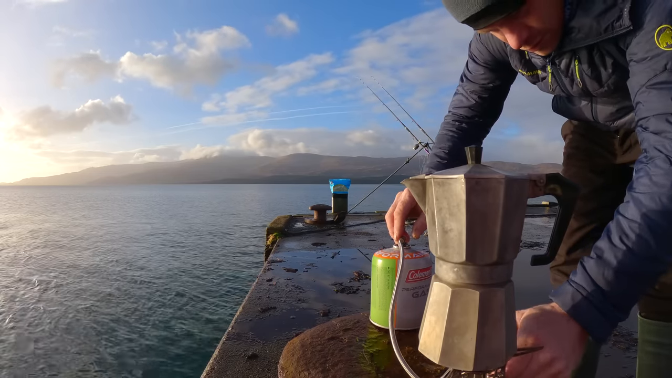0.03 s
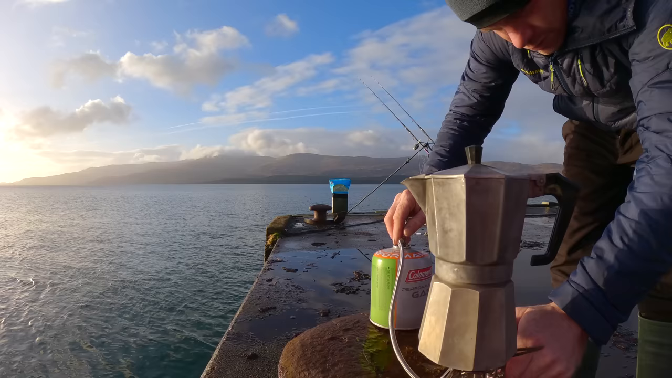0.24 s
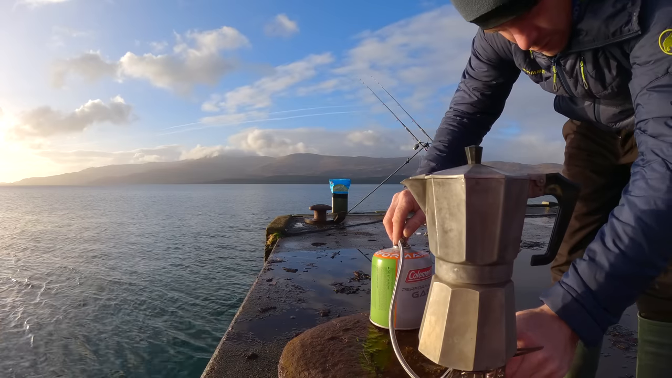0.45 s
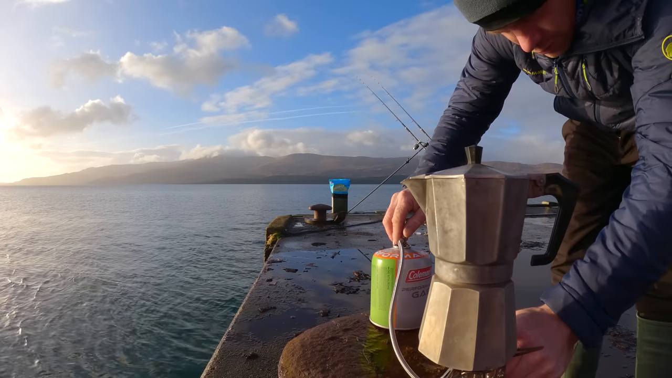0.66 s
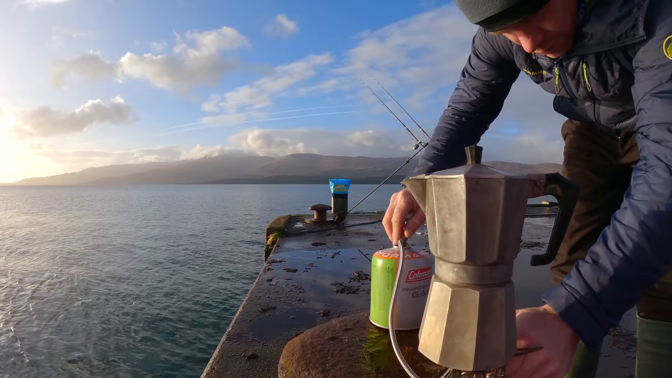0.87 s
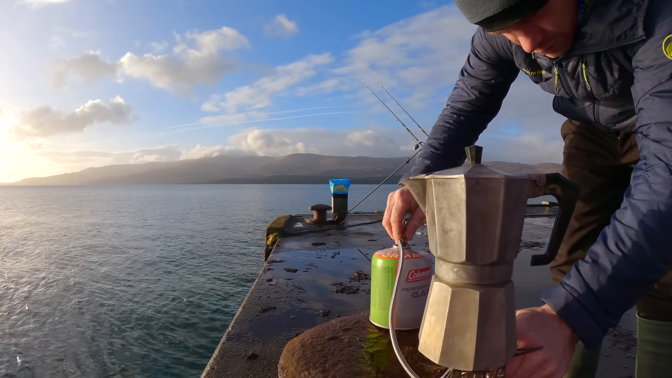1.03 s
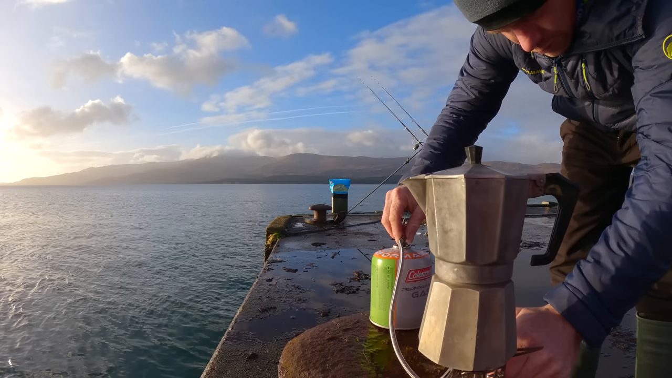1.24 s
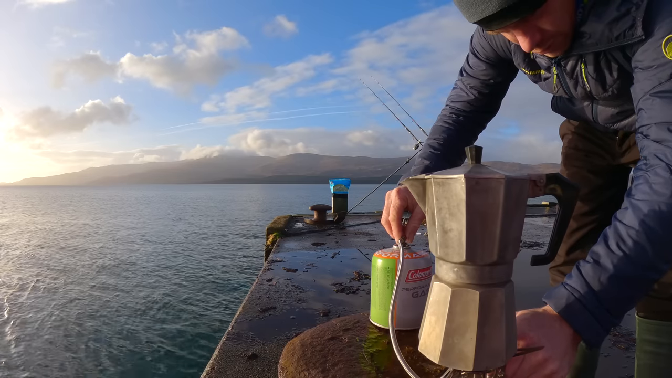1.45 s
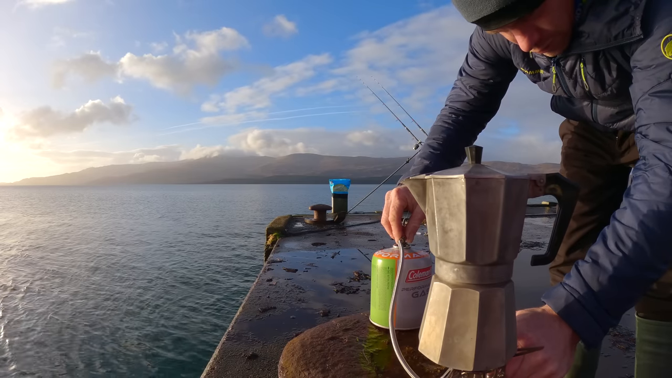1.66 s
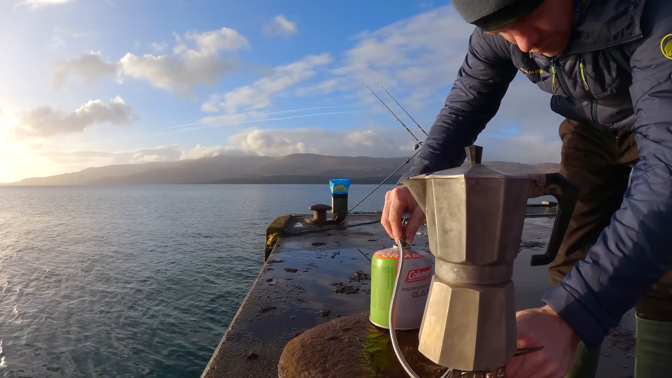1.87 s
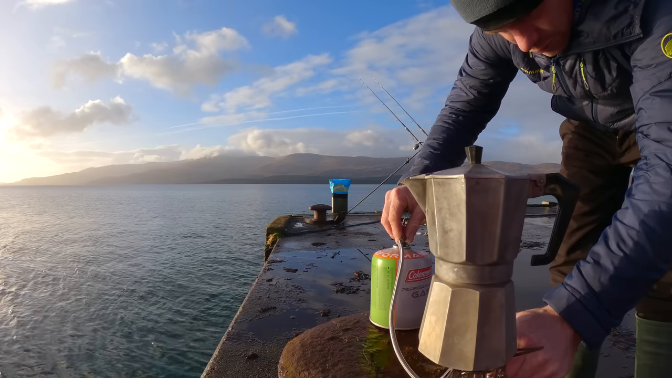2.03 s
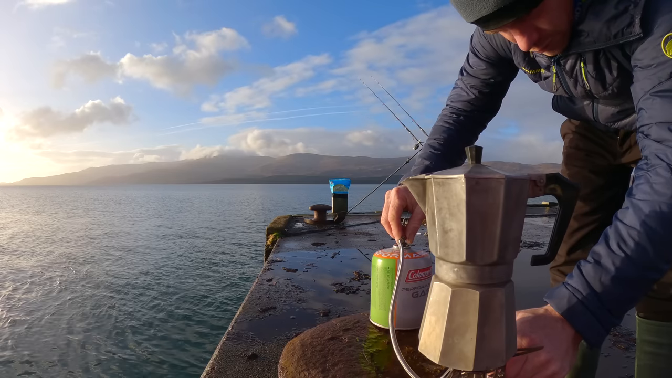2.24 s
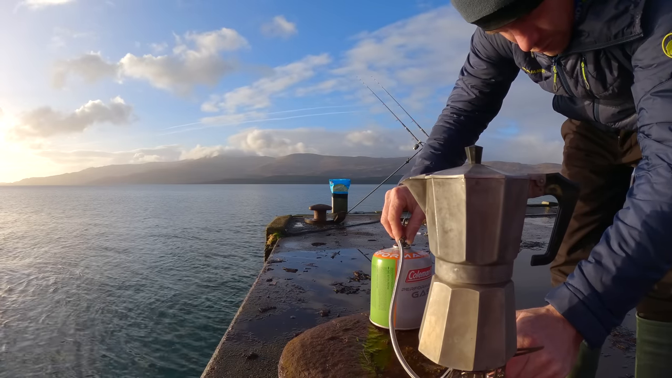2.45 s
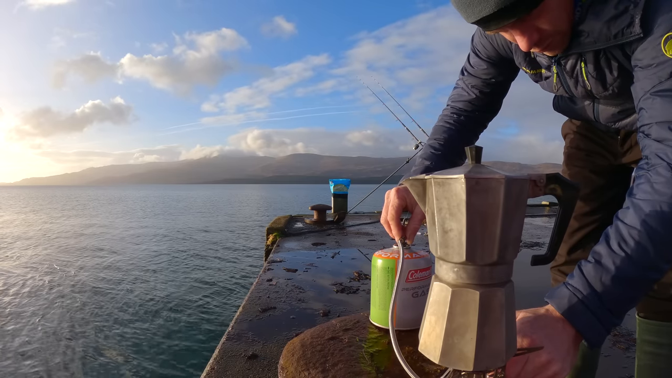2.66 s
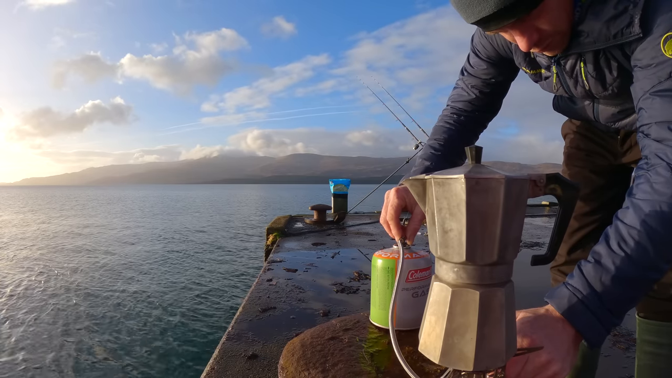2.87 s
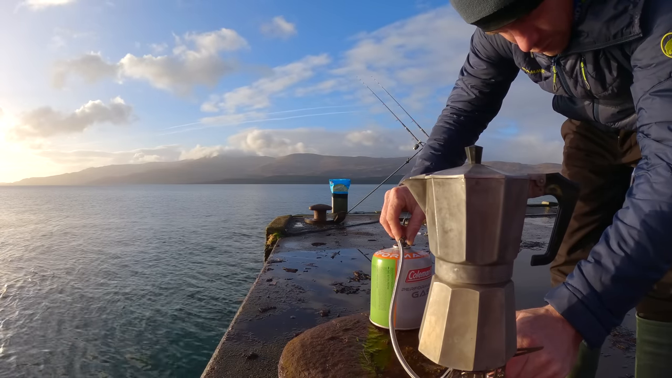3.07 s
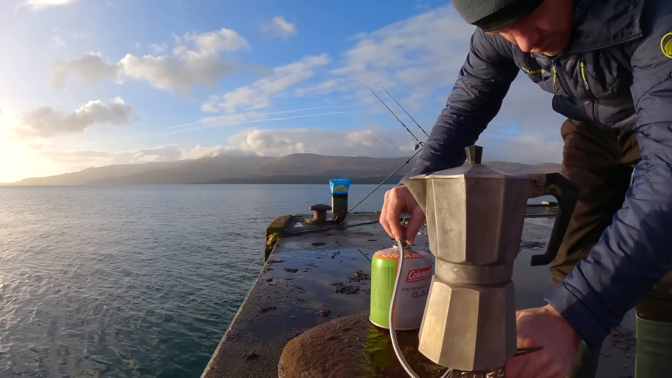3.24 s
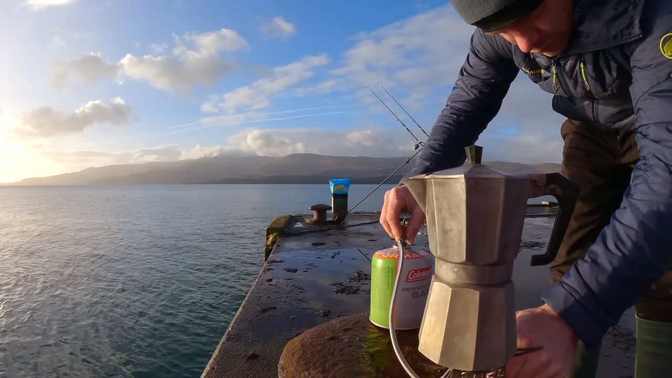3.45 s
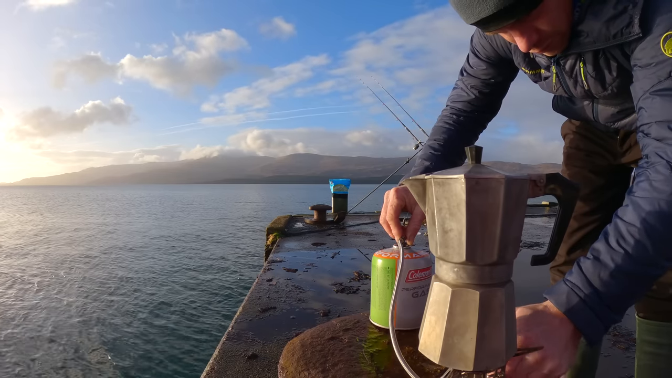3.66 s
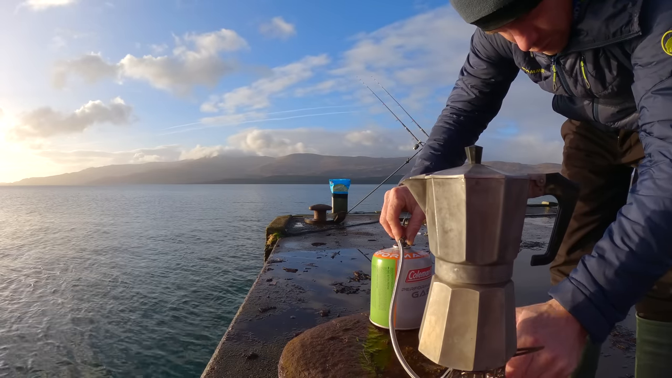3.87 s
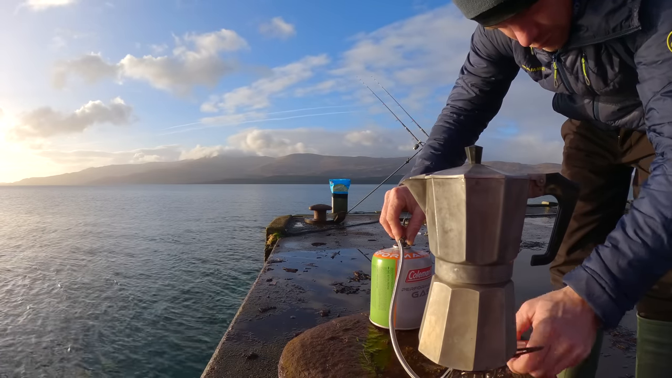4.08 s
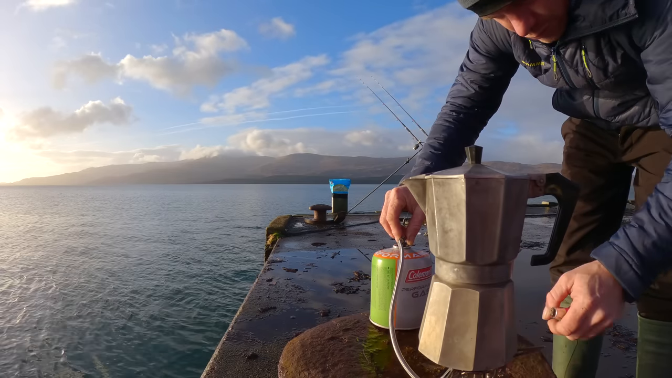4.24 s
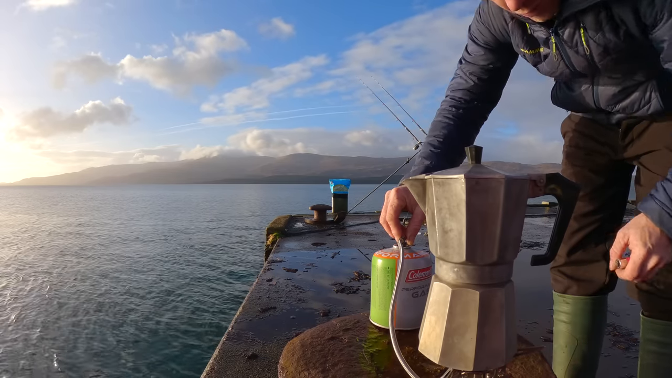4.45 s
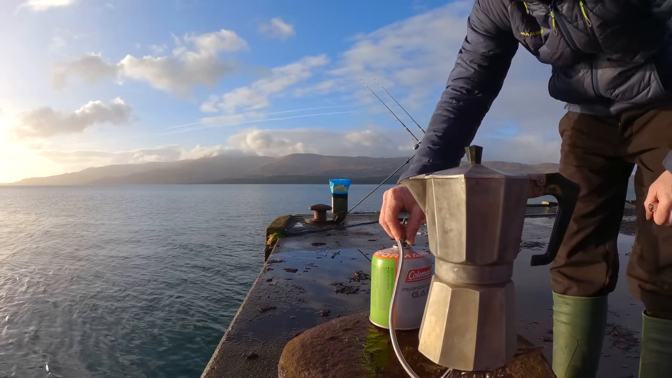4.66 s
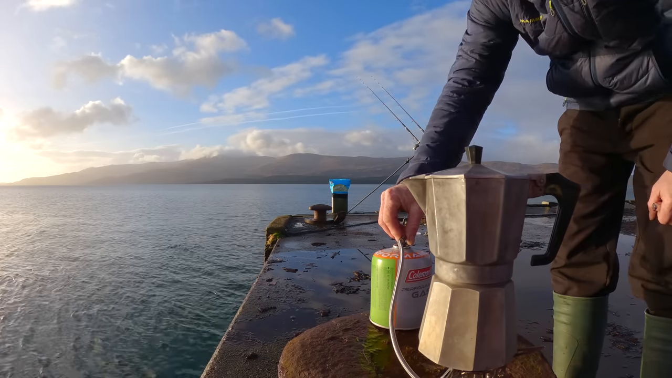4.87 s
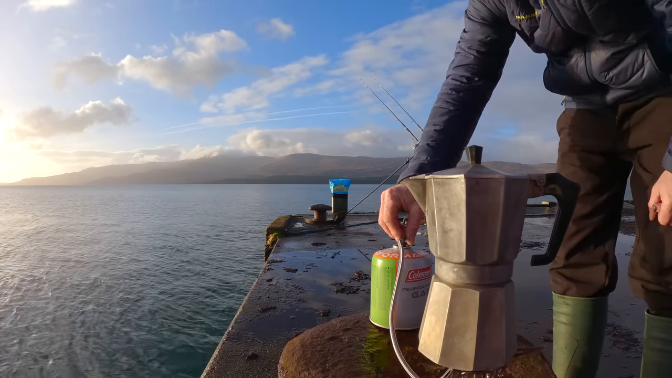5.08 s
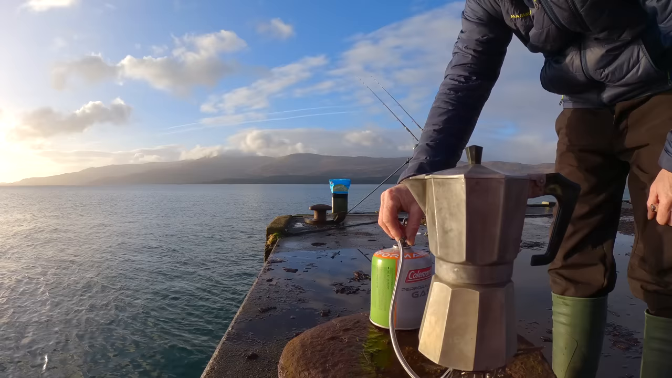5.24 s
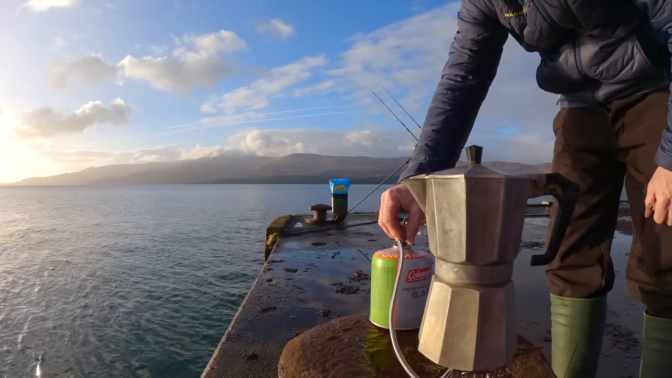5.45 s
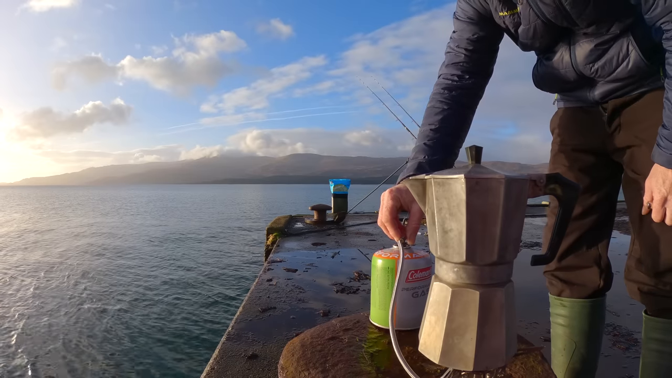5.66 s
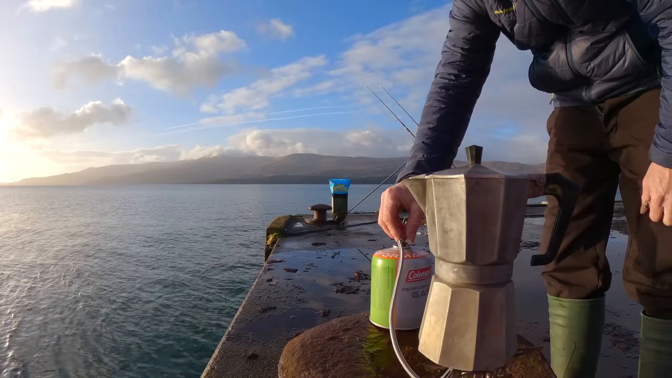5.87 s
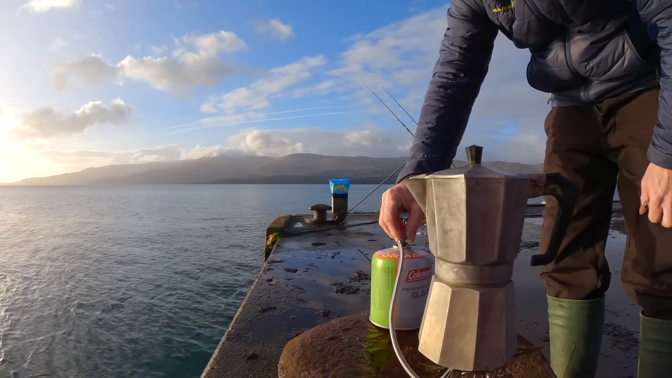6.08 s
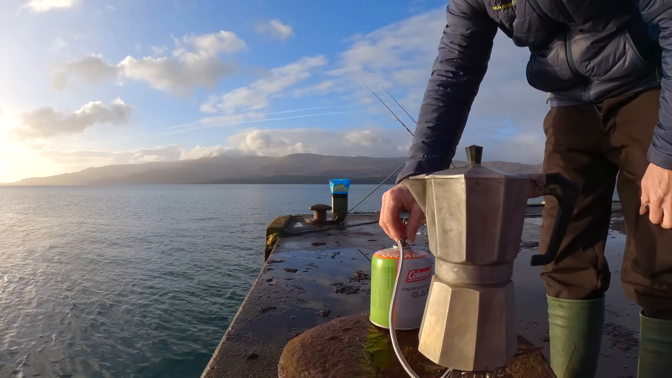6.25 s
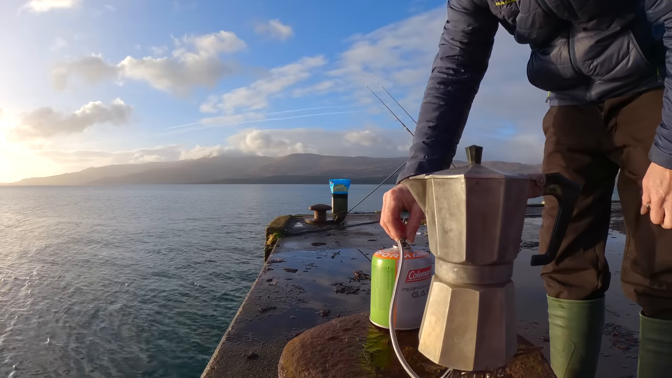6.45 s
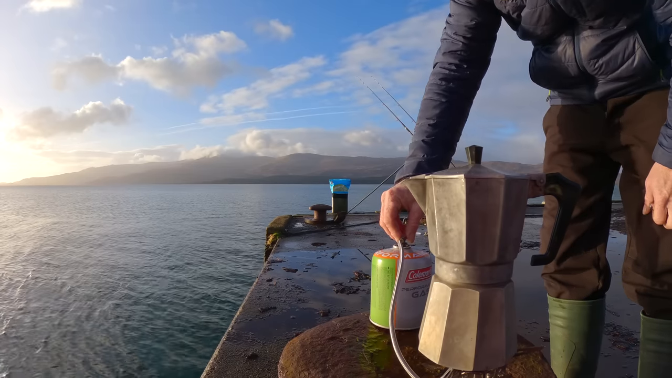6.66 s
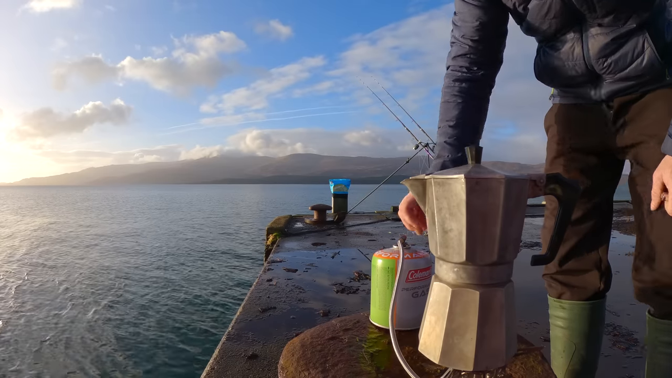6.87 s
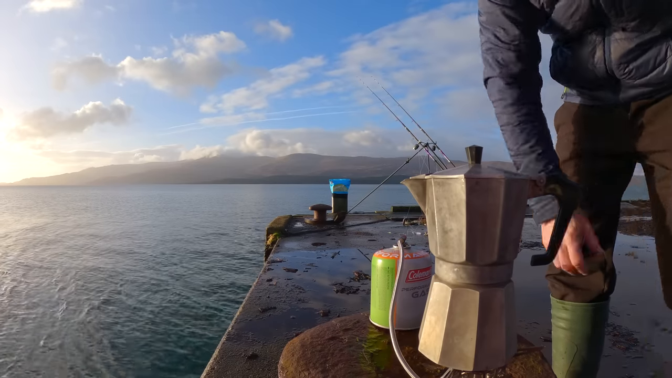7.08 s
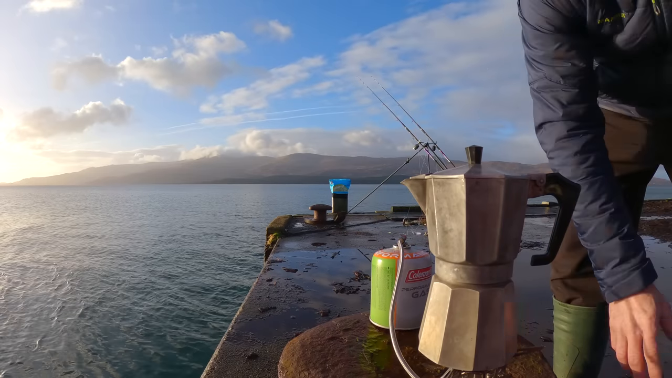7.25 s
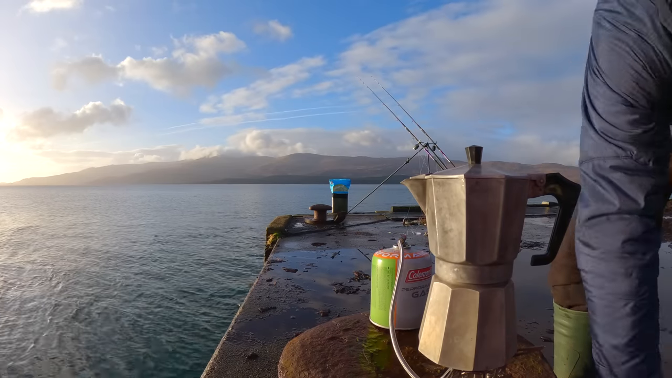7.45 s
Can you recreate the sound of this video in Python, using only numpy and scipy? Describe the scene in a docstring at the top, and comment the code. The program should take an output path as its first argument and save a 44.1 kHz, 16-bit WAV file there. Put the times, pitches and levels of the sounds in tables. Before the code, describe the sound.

Outdoors on a seaside quay, wind thuds against the microphone and water drips and laps on the left over a faint hum. A lighter scrapes, and gas pops with a low thump. A burner valve opens into a thin whistling hiss that grows strong and bright, with low flame flutter, while rubber boots scuff wet concrete.

```python
"""Wind buffets the right microphone port on a quay by the sea, water laps on the left and a distant mains hum
drones. A flint lighter is struck a few times as gritty noise bursts and gas pops with a low thump and rough
noise. The valve of a camping burner opens: noise hisses through the resonances of the jet, over low lumpy
noise for the flutter of the flame. Boots scuff the concrete as ringing grit; a few short patches of high
noise stand out."""
import sys
import numpy as np
from scipy import signal
from scipy.fft import rfft, irfft, next_fast_len
from scipy.io import wavfile
from scipy.ndimage import uniform_filter1d

SR = 44100
rng = np.random.default_rng(int(sys.argv[2]) if len(sys.argv) > 2 else 0)


def attenuation_scalar(level_db):
    """Turn a level in dB into a linear amplitude multiplier (20 dB per decade)."""
    decades = np.asarray(level_db, float) / 20
    return 10 ** decades


def output_pcm(signal):
    """Save a mono or channel-first signal as 16-bit PCM at the path in sys.argv[1].

    Samples are clipped to [-1, 1] before scaling.
    """
    pcm = np.clip(np.atleast_2d(signal).T, -1, 1) * 32767
    wavfile.write(sys.argv[1], SR, np.round(pcm).astype(np.int16))


N = 331191


def time():
    """Seconds of every sample."""
    return np.arange(N) / SR


def curve(table, column=1):
    """A table column along time, joined by straight lines."""
    rows = np.array(table)
    return np.interp(time(), rows[:, 0], rows[:, column])


def unit(x):
    """Scaled to rms 1."""
    return x / np.sqrt(np.mean(x ** 2))


def noise():
    """White noise."""
    return rng.standard_normal(N)


def colour(x, points):
    """Filter through (Hz, dB) points, straight lines over log frequency."""
    hz, db = np.transpose(points)
    size = next_fast_len(N)
    bins_hz = np.arange(size // 2 + 1) * SR / size
    gain = attenuation_scalar(np.interp(np.log(bins_hz + 1), np.log(np.maximum(hz, 1)), db))
    return irfft(rfft(x, size) * gain, size)[..., :N]


def band(x, hz, width_hz):
    """Resonance, gain 1 at the centre."""
    return signal.lfilter(*signal.iirpeak(hz, hz / width_hz, fs=SR), x)


def steep_band(x, hz, width_hz):
    """The same resonance passed twice."""
    return band(band(x, hz, width_hz), hz, width_hz)


def lowpass(x, hz):
    """Dulls everything above a corner frequency."""
    return signal.sosfilt(signal.butter(4, hz, fs=SR, output="sos"), x)


def bandpass(x, edges_hz):
    """Keeps what lies between two edges."""
    return signal.sosfilt(signal.butter(2, edges_hz, "bandpass", fs=SR, output="sos"), x)


def walk(rate):
    """Random levels held 1 / rate s and slewed twice; spread near 1."""
    k = int(SR / rate)
    held = np.repeat(rng.standard_normal(N // k + 1), k)
    return 1.45 * uniform_filter1d(uniform_filter1d(held, k), k)[:N]


def swell(s, db, rise, fall):
    """Bell-shaped rise to the peak at s, exponential fall."""
    t = time() - s
    return attenuation_scalar(db) * np.exp(np.where(t < 0, -(t / rise) ** 2, -t / fall))


def gritty(rate, spread_db):
    """Random clicks, rate per second, of uneven size and sign."""
    chance = rng.random((2, N))
    size_db = np.minimum(-spread_db * np.log(1 - chance[1]), 15)
    clicks = (chance[0] < rate / SR) * attenuation_scalar(size_db)
    return unit(clicks * np.sign(noise()))


def place(x, pan_db, lag=0):
    """Left and right, pan_db apart; the left port hears it lag samples late (early if negative)."""
    return np.array([np.roll(x, lag) * attenuation_scalar(pan_db / 2), x * attenuation_scalar(-pan_db / 2)])


def puffs(table, turns, ring_hz):
    """Short pressure swings, a bell of a turn or two, that leave a low cavity ringing."""
    out = np.zeros(N)
    phase = rng.uniform(-.6, .6, len(table))
    length = SR // 10
    for (s, db, hz), p in zip(table, phase):
        first = min(max(int((s - .05) * SR), 0), N - length)
        turn = (time()[first:first + length] - s) * hz
        out[first:first + length] -= attenuation_scalar(db) * np.exp(-(turn / turns) ** 2) * np.cos(2 * np.pi * turn + p)
    return out + 0.25 * band(out, ring_hz, 33)


def wind_and_gas_thump():
    """Air tumbling past the right port, rumble, eddies and buffets; catching gas thumps through the same noise."""
    # the strongest buffets on the port: middle_s, level_db, pitch_hz
    strong_buffets = [(0.0428, -26, 136), (0.0928, -23.5, 131), (0.1088, -14.5, 245), (0.1459, -16.5, 239),
                      (0.3235, -20, 178), (0.337, -24, 190), (0.3941, -20, 142), (0.453, -25, 222),
                      (0.488, -24, 309), (0.516, -26, 242), (1.245, -33.5, 98.5), (2.9934, -16, 294),
                      (3.0135, -24.5, 228), (3.0231, -19, 223), (3.035, -24, 254), (3.1284, -22, 122),
                      (3.2127, -19.5, 151), (3.225, -25, 172), (3.293, -19, 165), (3.451, -25, 135.6),
                      (4.3071, -25, 147), (4.4635, -19, 190), (4.482, -25, 187)]
    # steady rumble of the breeze: time_s, level_db
    breeze = [(0, -56.5), (2.9, -53.5), (3.6, -45), (4.3, -41), (4.6, -50), (5.05, -40), (5.8, -43),
              (7.51, -47.5)]
    # wind gusts, and at 1.585 s the low thump of the gas catching: start_s, length_s, level_db
    surges = [(0, 0.196, -36), (0.313, 0.256, -40), (1.585, 0.064, -40.5), (2.98, 0.514, -44.5),
              (4.302, 0.204, -47)]
    edge_s = 0.006
    # small swings within the surges: middle level over the surge, full scatter, middle pitch
    eddy_db, eddy_spread_db, eddy_hz = 10, 15.5, 165
    t = time()
    surge = 0
    for s, length, db in surges:
        inside_s = np.minimum(t - s, s + length - t)
        surge = surge + attenuation_scalar(db) * np.clip(inside_s / edge_s + .5, 0, 1) ** 2
    lumps = lowpass(noise() * attenuation_scalar(3.0 * walk(60)), 420)
    rumble = unit(band(lumps, 142.0, 151)) * (attenuation_scalar(curve(breeze)) + surge)
    chance = rng.random((300, 3))
    surge_db = 20 * np.log10(surge[(chance[:, 0] * N).astype(int)] + 1e-9)
    eddies = np.transpose([chance[:, 0] * N / SR,
                           surge_db + eddy_db + eddy_spread_db * (chance[:, 1] - .5),
                           eddy_hz * 2 ** (chance[:, 2] - .5)])
    # eddies that fall outside the surges are left out
    buffets = puffs(list(strong_buffets) + list(eddies[surge_db > -60]), turns=0.52, ring_hz=258)
    return place(rumble, -2.1) + place(buffets, -12.5)


def bubbles(table, cycles, rough):
    """Each bubble rings a few cycles and glides up; splashing roughens the ring."""
    out = np.zeros(N + SR)
    for s, db, hz in table:
        turn = np.arange(int(6 * cycles * SR / hz)) * hz / SR
        envelope = (1 - np.exp(-turn / 1.1)) * np.exp(-turn / cycles)
        ring = np.sin(2 * np.pi * turn * (1 + 0.00076 * turn))
        out[int(s * SR):][:len(turn)] += attenuation_scalar(db) * envelope * ring
    return out[:N] * (1 + rough * walk(2500))


def water():
    """Lapping on the left: clear drops, a patter of faint ones, spray, dry snaps and a wash of noise."""
    # the clearest drops and slaps at the quay wall: start_s, level_db, pitch_hz
    clear_drops = [(0.784, -41, 2140), (0.803, -38, 1870), (0.814, -30, 2680), (0.944, -46, 2250),
                   (1.035, -45.5, 3050), (2.267, -47, 3880), (2.296, -33.5, 3130), (2.307, -36.5, 1784),
                   (2.33, -43, 1730), (2.356, -39.5, 3300), (2.398, -47.5, 935), (2.486, -44, 3270),
                   (3.05, -41.5, 3200), (3.117, -35, 2080), (3.393, -41, 2700), (3.494, -39.5, 2280),
                   (3.788, -39, 1880)]
    # spray after a slap: peak_s, level_db, rise_s, fall_s
    sprays = [(0.813, -34, 0.0007, 0.0073), (0.842, -33, 0.0026, 0.018), (2.297, -47.5, 0.0011, 0.042)]
    # tone of the spray: frequency_hz, relative_gain_db
    spray_colour = [(900, -26), (2500, -1), (5000, -8.5), (9600, -21.5), (13000, -45.5), (14500, -91)]
    # sharp dry snaps of a slap: peak_s, level_db
    snaps = [(2.2962, -39), (2.307, -43), (2.324, -42), (2.382, -46), (2.423, -49), (2.468, -37.5),
             (2.807, -47), (2.834, -46.5)]
    snap_fall_s = 0.0016
    # tone of the wash: frequency_hz, relative_gain_db
    sea_colour = [(30, -32), (70, -27), (250, 2), (500, -15), (1200, -18), (3700, -24), (6500, -34.5),
                  (7600, -32), (9600, -44.5), (13000, -46)]
    # wash along time, middle of the two ports: time_s, level_db
    sea_level = [(0, -62), (.9, -56.5), (2.4, -57), (4, -52), (7.51, -48)]
    # faintest drop, and how far the rare loud ones rise over it
    patter_db, patter_spread_db = -63.5, 13
    # the patter is weaker at first
    calm_db, calm_until_s = -8.5, 0.77
    chance = rng.random((1900, 3))
    patter = np.transpose([chance[:, 0] * N / SR,
                           patter_db + patter_spread_db * chance[:, 1] ** 3,
                           900 * 6 ** chance[:, 2]])
    patter_gain = attenuation_scalar(2.3 * walk(4.5) + calm_db * (time() < calm_until_s))
    drops = bubbles(clear_drops, cycles=16.1, rough=0.48)
    drops = drops + bubbles(patter, cycles=8.6, rough=0.28) * patter_gain
    spray = unit(colour(gritty(3700, 14.0), spray_colour)) * sum(swell(*row) for row in sprays)
    snap_shape = sum(swell(s, db, snap_fall_s / 4, snap_fall_s) for s, db in snaps)
    spray = spray + unit(bandpass(noise(), [800, 4600])) * snap_shape
    mid, side = rng.standard_normal((2, N))
    # mostly the treble differs between the ports
    side = colour(side, [(300, -18.5), (1000, -1.5)])
    wash = unit(colour(np.array([mid + side, mid - side]), sea_colour))
    wash = wash * attenuation_scalar(curve(sea_level) + 1.7 * walk(18) + np.array([[3.], [-3.]]))
    return place(drops, 15., lag=-3) + place(spray, 12., lag=-3) + wash


def hum():
    """Mains harmonics of distant machinery, sines that waver a little in level."""
    # harmonics ahead of the pan: pitch_hz, rms_level_db
    harmonics = [(242, -52.5), (301.5, -62), (361, -63)]
    drone = 0
    for hz, db in harmonics:
        wavering = np.sqrt(2) * attenuation_scalar(db + 0.36 * walk(5.3))
        drone = drone + wavering * np.sin(2 * np.pi * (hz * time() + rng.random()))
    return place(drone, 1.2)


def lighter():
    """The toothed wheel grinds the flint: gritty bright bursts; a slow turn squeaks in the housing."""
    # flint wheel scrapes: peak_s, level_db, rise_s, fall_s
    strikes = [(0.651, -32.5, 0.014, 0.015), (0.671, -34.5, 0.0038, 0.0031), (1.527, -34.5, 0.0012, 0.0076),
               (1.546, -29.5, 0.0084, 0.017), (1.556, -28, 0.0015, 0.0052), (1.5766, -45, 0.0008, 0.003),
               (3.535, -32, 0.019, 0.026), (3.687, -27, 0.017, 0.0024)]
    # tone of the flint: frequency_hz, relative_gain_db
    flint_colour = [(1500, -24), (2900, -14), (3800, 2), (5500, 3), (6700, 1), (7700, -1), (9600, -9),
                    (12500, -17), (14000, -76)]
    # slow turns of the wheel: peak_s, level_db, rise_s, fall_s
    squeaks = [(1.451, -54.5, 0.004, 0.077), (1.495, -44.5, 0.001, 0.04)]
    grit = gritty(12000, 0.58)
    grind = unit(colour(grit, flint_colour)) * attenuation_scalar(1.7 * walk(440))
    grind = grind * sum(swell(*row) for row in strikes)
    squeak = unit(band(band(grit, 5500, 615), 5850, 1270)) * sum(swell(*row) for row in squeaks)
    return place(grind + squeak, -2.7, lag=1)


def pop_noise_and_boots():
    """Rough noise of the gas pop, then grit under dull rubber soles: each rings a hollow and fixed resonances."""
    # near 1.6 s the rough noise of the gas pop, sweeping down; from 3.6 s scuffs on wet concrete:
    # peak_s, level_db, rise_s, fall_s, hollow_hz, grit_gain_db (fixed resonances, before the hollow is added)
    scrapes = [(1.577, -39, 0.012, 0.0085, 1660, 8), (1.604, -38, 0.014, 0.023, 615, -15),
               (1.668, -56, 0.006, 0.014, 700, -24), (3.693, -45.5, 0.085, 0.079, 950, 2),
               (4.34, -47.5, 0.031, 0.056, 890, -4), (4.434, -39, 0.058, 0.038, 826, -5.5),
               (4.535, -50, 0.017, 0.031, 850, -21), (4.748, -45.5, 0.019, 0.02, 1580, 9),
               (5.023, -36.5, 0.043, 0.065, 740, 0.5), (5.119, -40.5, 0.16, 0.054, 920, -1.5),
               (5.351, -34, 0.012, 0.093, 865, -1), (5.43, -37.5, 0.053, 0.038, 880, -5),
               (6.967, -35, 0.006, 0.013, 1350, -2), (7.04, -43.5, 0.14, 0.037, 920, -5),
               (7.336, -36, 0.026, 0.097, 910, -4.5), (7.497, -35, 0.037, 0.098, 874, -11)]
    # fixed resonances of the grit: pitch_hz, width_hz, relative_gain_db
    grit_modes = [(527, 89, -7), (1670, 4200, -10.5), (2846, 1000, -11)]
    out = 0
    # independent grit at two places, right and slightly left
    for pan_db in (-7., 1.5):
        grit = lowpass(gritty(6000, 3.6) * attenuation_scalar(2.5 * walk(120)), 3800)
        fixed = sum(attenuation_scalar(db) * steep_band(grit, hz, width) for hz, width, db in grit_modes)
        bursts = 0
        for s, db, rise, fall, hollow_hz, grit_db in scrapes:
            rough = unit(fixed * attenuation_scalar(grit_db) + steep_band(grit, hollow_hz, 680))
            bursts = bursts + swell(s, db, rise, fall) * rough
        out = out + place(bursts, pan_db)
    return out


def flame():
    """Burning gas flutters: lumpy low noise in the hollow under the pot; gas pockets catch with a pop."""
    # flutter, small at first, full once the valve is opened wide: time_s, level_db
    flutter = [(3.5, -73), (4.85, -57), (5.05, -32.5), (5.65, -35), (5.8, -39), (7.51, -41)]
    # resonances of the hollow: pitch_hz, width_hz, relative_gain_db
    flame_modes = [(319, 101, 10.5), (196, 73, 3.5)]
    # gas pockets that catch: middle_s, level_db, pitch_hz
    pops = [(1.595, -17, 225), (1.6028, -20, 242), (1.6075, -18, 246), (1.621, -15, 247)]
    # each pop starts with a crack: level against the pop, fall
    crack_db, crack_s = -8.5, 0.0015
    lumps = noise() * attenuation_scalar(3.0 * walk(45))
    roar = sum(attenuation_scalar(db) * band(band(lumps, hz, width), hz, 2 * width) for hz, width, db in flame_modes)
    lit = np.clip((time() - 3.5) / 0.19, 0, 1)
    # half a turn ahead of the middle of the pop
    crack_shape = sum(swell(s - .5 / hz, db + crack_db, crack_s / 2, crack_s) for s, db, hz in pops)
    cracks = unit(band(np.cumsum(noise()), 950, 1200)) * crack_shape
    burning = unit(roar) * attenuation_scalar(curve(flutter)) * lit
    return place(burning + cracks + puffs(pops, turns=.55, ring_hz=230), -1.5)


def jet():
    """Turbulent gas through the nozzle: narrow noise bands flicker, most in the treble, over a rough ring."""
    # valve: time_s, level_db (middle of the ports), treble_gain_db (above the split, before the tone filter)
    valve = [(2.53, -59, -1), (2.78, -61, 4), (2.9, -49.5, 1), (3.08, -47, 3), (3.13, -41.5, 1.5),
             (3.6, -37.5, 1.5), (4.1, -37.5, 4.5), (4.16, -34.5, -9), (4.44, -39, 6), (4.57, -45, -10.5),
             (4.62, -35.5, 1.5), (4.79, -41.5, -4), (4.93, -35.5, 2.5), (5.05, -32, 1), (5.3, -30, 5.5),
             (5.5, -32, -3), (6.2, -32, -2), (6.72, -34, 5), (6.88, -36, -7), (6.98, -36.5, 8.5),
             (7.12, -39, 0), (7.5, -44, 4)]
    # tone of the hiss: frequency_hz, relative_gain_db
    jet_colour = [(600, -42), (1150, -14.5), (2250, -18.5), (3400, -14.5), (4200, -7.5), (4850, 7),
                  (5700, -9), (6500, -12.5), (7800, -4.5), (8500, -10), (9200, -30.5), (10400, -47.5),
                  (11600, -81)]
    split_hz, opens_s = 5800, 2.44
    nozzle_hz, narrow_hz, wide_hz = 4870, 300, 400
    bands = 0
    shared = walk(14)
    treble = attenuation_scalar(curve(valve, column=2) + 1.4 * walk(30))
    for hz in 600 * 2 ** np.arange(0, 4.5, 1 / 6):
        edges_hz = [hz * 2 ** (-1 / 12), hz * 2 ** (1 / 12)]
        mid, side = bandpass(rng.standard_normal((2, N)), edges_hz)
        # the quiet middle range arrives by reflections, so the ports agree less there
        spread = .6 if hz < 3800 else .12
        part = mid + spread * side * np.array([[1], [-1]])
        if hz > split_hz:
            flicker = treble * attenuation_scalar(3.8 * walk(22))
        else:
            flicker = attenuation_scalar(1.1 * shared + (2.8 if hz > 3800 else 1.4) * walk(22))
        bands = bands + part * flicker
    hiss = unit(colour(bands, jet_colour))
    # the nozzle rings in a rough band, narrowest and clearest while the valve is barely open
    eddy = noise() * attenuation_scalar(4.0 * walk(70))
    flow = np.interp(time(), [2.95, 3.15], [0, 1])
    narrow = unit(steep_band(eddy, nozzle_hz, narrow_hz))
    broad = unit(steep_band(eddy, nozzle_hz, wide_hz))
    whistle = (narrow + flow * (broad - narrow)) * attenuation_scalar(2 * walk(24))
    share = 3. - 2.51 * flow
    blend = (hiss + share * whistle) / np.hypot(1, share)
    opening = np.clip((time() - opens_s) * 10, 0, 1) ** 2
    return blend * attenuation_scalar(curve(valve) + np.array([[-.8], [.8]])) * opening


def high_patches():
    """Short patches of high noise, a few milliseconds round one high resonance."""
    # patches: peak_s, level_db
    patches = [(3.1333, -43.5), (3.6093, -32.5), (5.9376, -40)]
    patch_hz, fall_s = 11500, 0.0036
    shape = sum(swell(s, db, fall_s / 4, fall_s) for s, db in patches)
    return place(unit(band(noise(), patch_hz, 3500)) * shape, 5.)


def scene():
    """Everything at the two ports."""
    early = wind_and_gas_thump() + water() + hum() + lighter()
    return early + pop_noise_and_boots() + flame() + jet() + high_patches()


def top_cut(x):
    """Nothing passes above the cut-off."""
    return signal.sosfilt(signal.butter(12, 13900, fs=SR, output="sos"), x)


def record(dry):
    """A small microphone that drops the deep bass and clips."""
    clip_level = 0.325
    thin = signal.sosfilt(signal.butter(2, 50, "highpass", fs=SR, output="sos"), dry)
    return top_cut(thin.clip(-clip_level, clip_level))


dry = scene()
out = record(dry)
output_pcm(out)
```